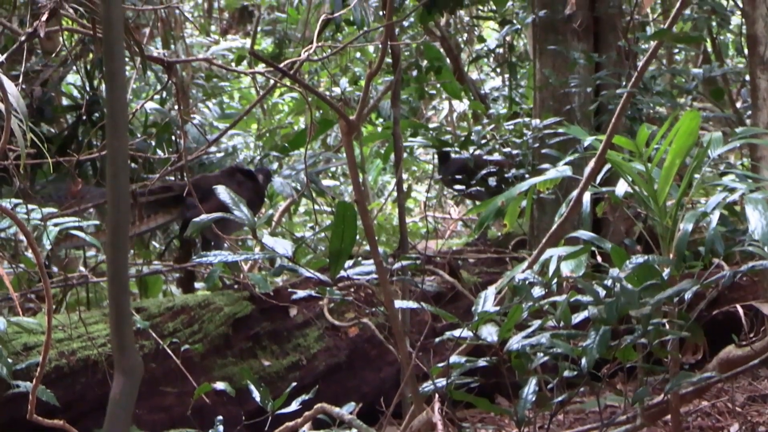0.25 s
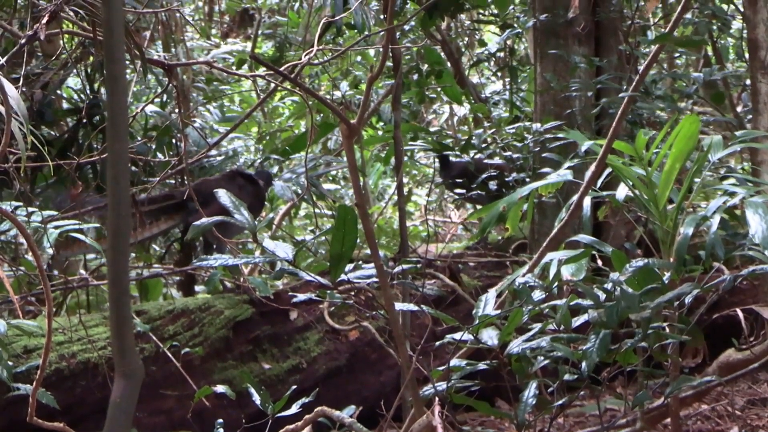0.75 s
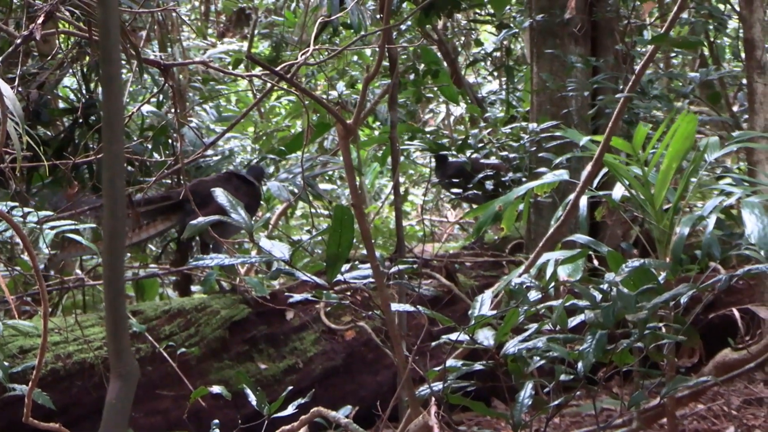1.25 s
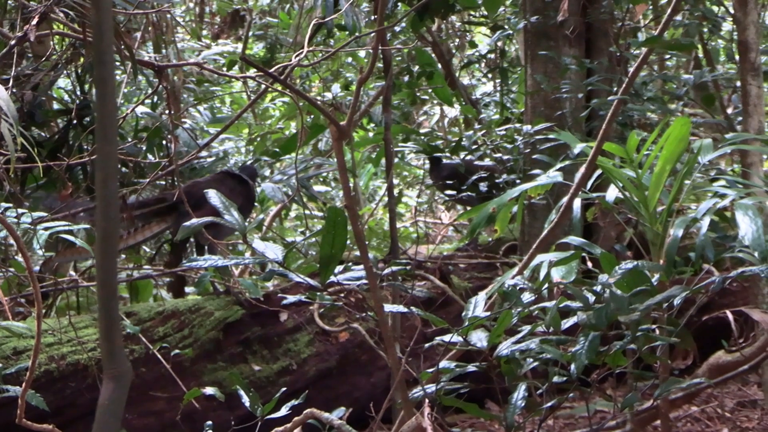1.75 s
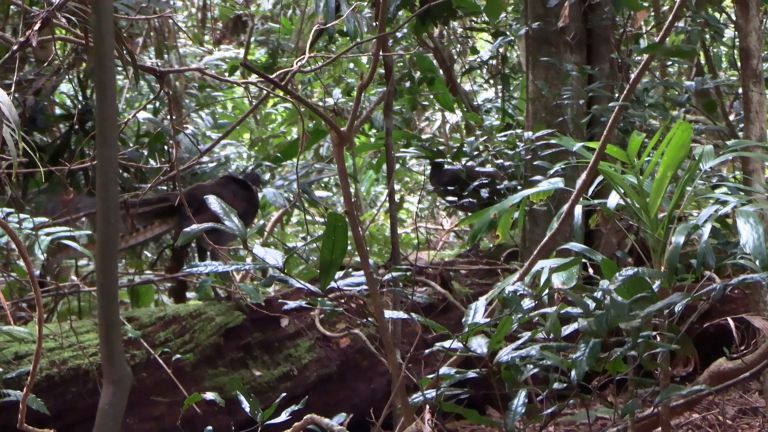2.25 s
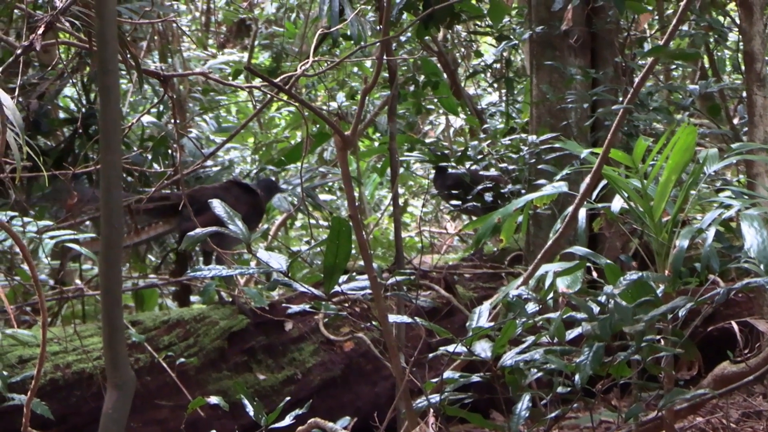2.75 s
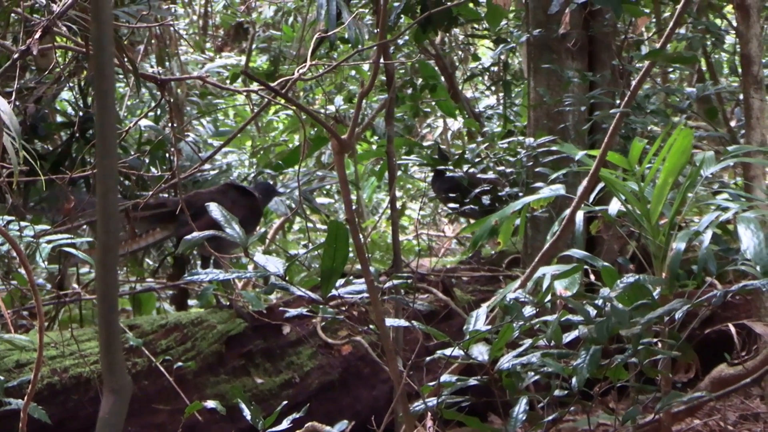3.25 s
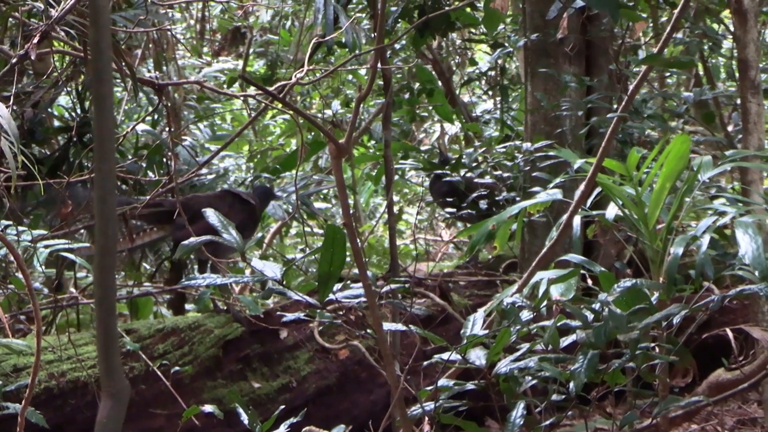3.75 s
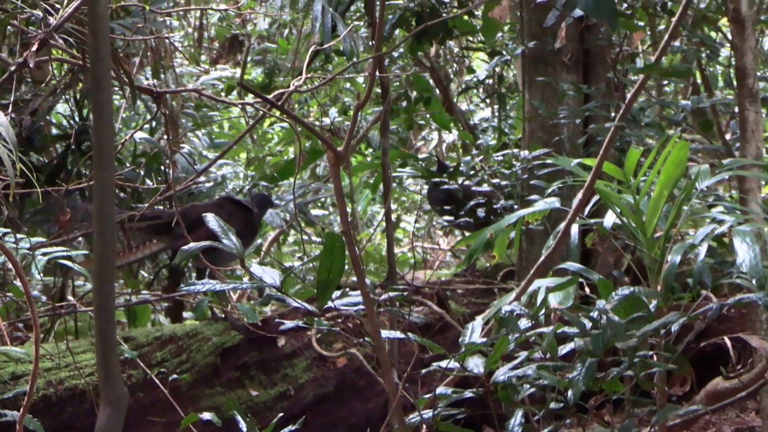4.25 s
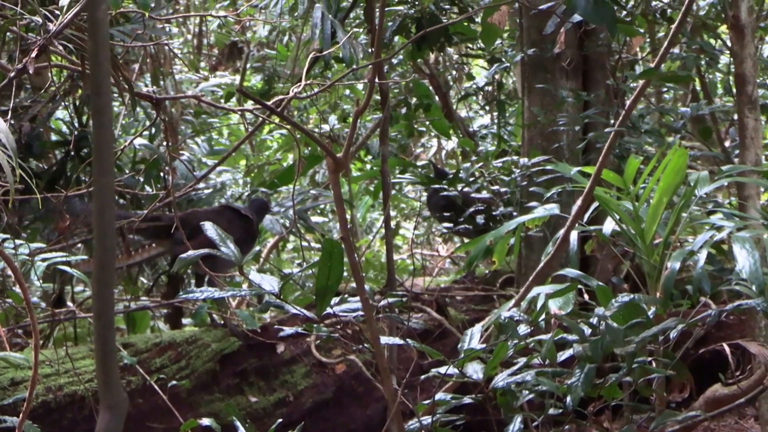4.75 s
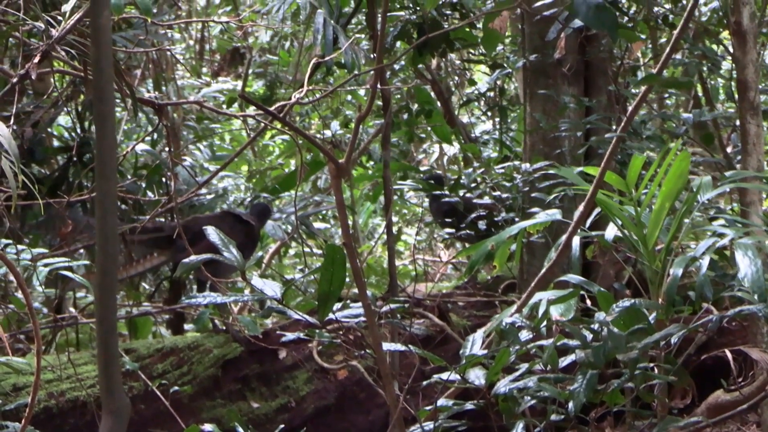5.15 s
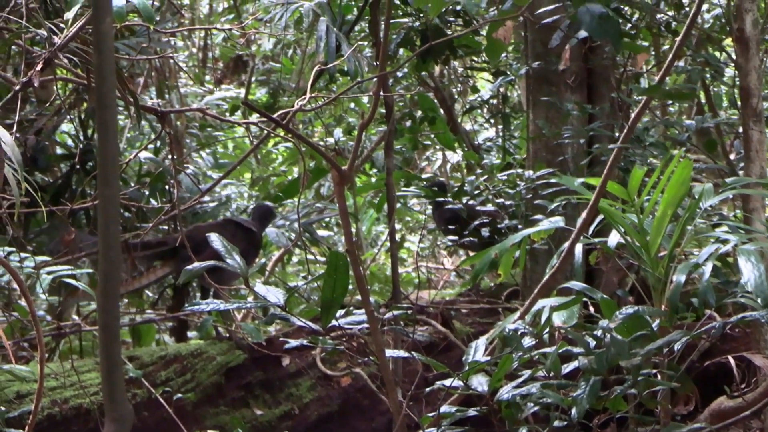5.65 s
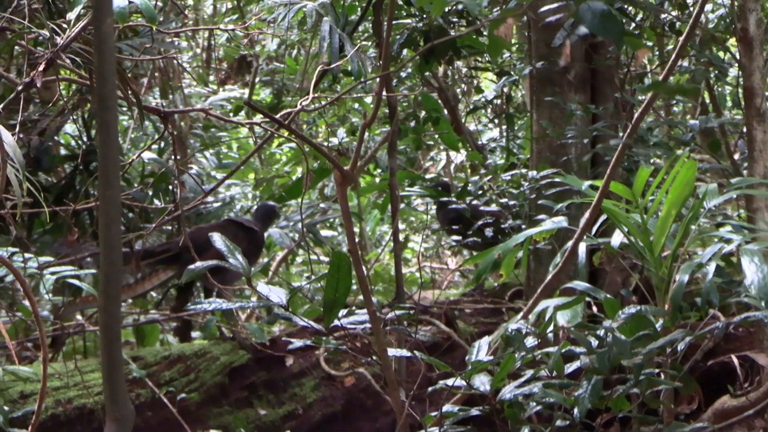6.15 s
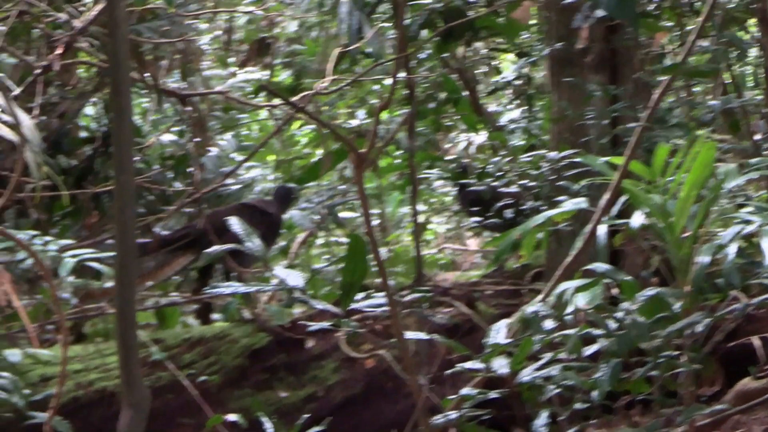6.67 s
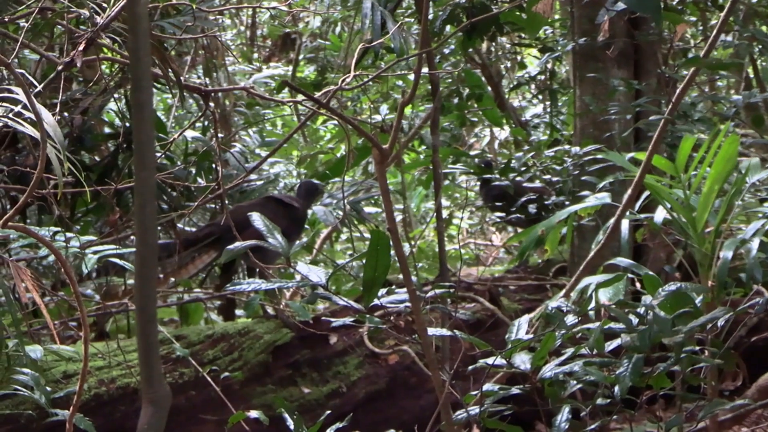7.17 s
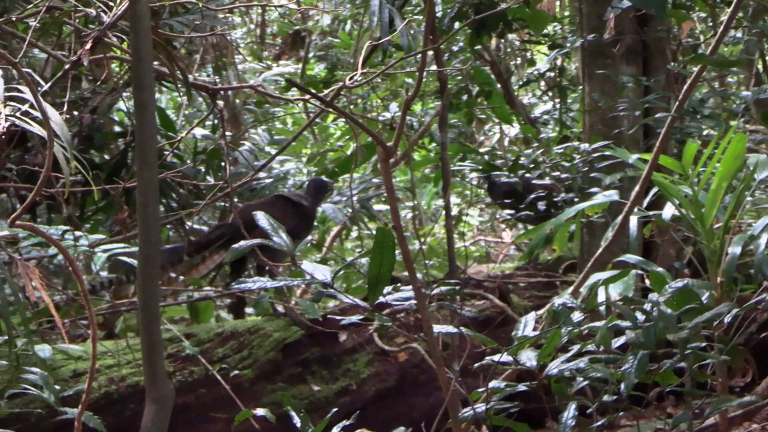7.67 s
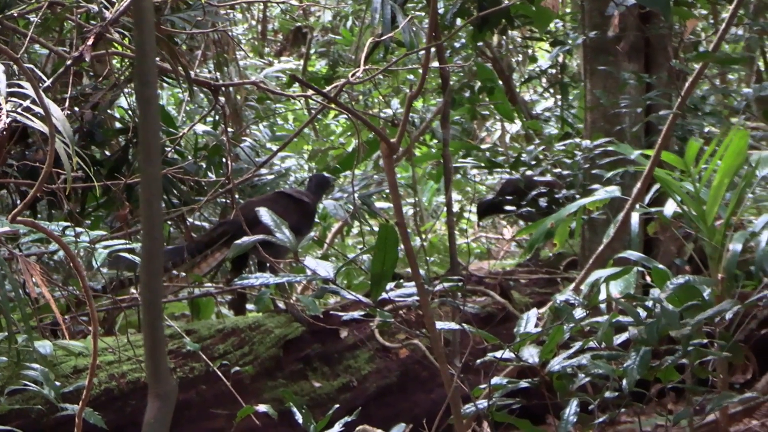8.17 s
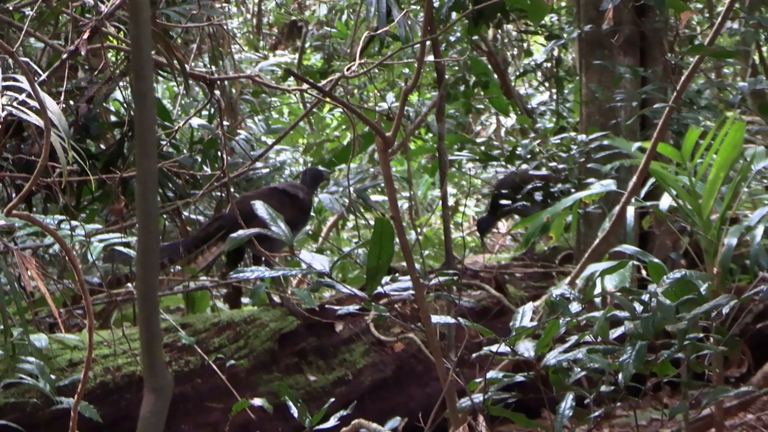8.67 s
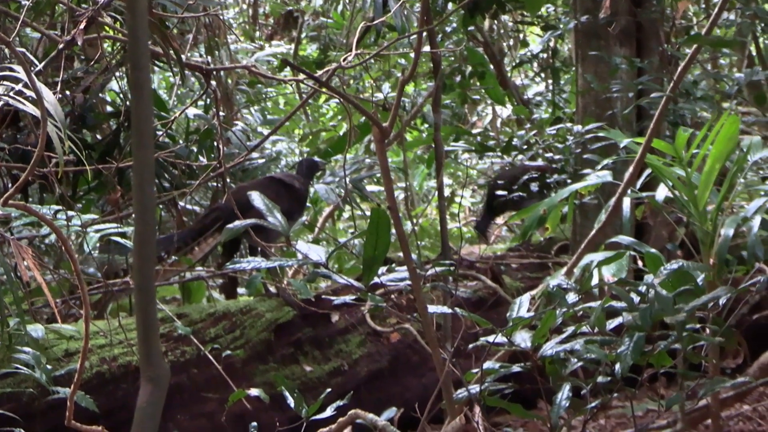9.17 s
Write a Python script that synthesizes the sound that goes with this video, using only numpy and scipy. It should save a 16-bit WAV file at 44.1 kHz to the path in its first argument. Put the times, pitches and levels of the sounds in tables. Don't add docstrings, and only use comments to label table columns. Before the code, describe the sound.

A nearby bird repeats sharp bill clicks, each sweeping up into a whoop and dry rasp, while distant whistles echo through breezy rainforest.

```python
import sys
import numpy as np
from scipy import signal
from scipy.fft import rfft, irfft
from scipy.io import wavfile
from scipy.ndimage import uniform_filter1d

SR = 44100
rng = np.random.default_rng(int(sys.argv[2]) if len(sys.argv) > 2 else 0)


def transcribe(signal):
    frames = np.atleast_2d(signal).T
    limited = np.clip(frames, -1, 1)
    pcm = np.round(limited * 32767).astype(np.int16)
    wavfile.write(sys.argv[1], SR, pcm)


def volts_from_decibels(level):
    exponent = np.asarray(level, float) / 20
    return 10 ** exponent


N = 415422
LEAD = SR // 5

# (frequency [Hz], level [dB per Hz])
FOREST_SPECTRUM = [(350, -15), (600, -7), (688, -6), (916, -5.5), (1310, -8), (1500, -14), (3180, -19.5),
                   (3400, -20), (15700, -30.5)]
FOREST_DB = -52.5
# (frequency [Hz], level [dB per Hz])
WIND_SPECTRUM = [(7.1, -13.5), (12, 11), (29, 8.5), (40, -1.5), (60, -13.5), (117, -10), (204, -30.5),
                 (252, -28.5), (333, -34.5), (600, -39), (780, -60), (1320, -120)]
# (time [s], level [dB])
GUST = [(0, -28), (.7, -35.5), (1.301, -32), (1.8, -37.5), (2.2, -34.5), (3, -32.5), (4.698, -33),
        (5.2, -37), (5.802, -32.5), (6.301, -34.5), (7.0, -34.5), (7.4, -32), (7.7, -35), (8.1, -32.5),
        (9.1, -34.5), (9.42, -29.5)]
# (low edge [Hz], high edge [Hz], steady level [dB], share of gust followed [1], own wander [dB])
WIND_BANDS = [
    (7.95, 49.5, -28.5, 1, 0.33),
    (48.5, 193, -36., 0.055, .5),
    (189.8, 563, -48, 0.53, .5),
]
# (time [s], pitch [Hz], length [s], level [dB])
KNOCKS = [
    (5.5, 171.3, 0.02, -34),
    (7.72, 65.9, 0.042, -24.5),
    (9.03, 166, 0.03, -37.5),
]
# (time [s], length [s], first pitch [Hz], last pitch [Hz], level [dB])
FAR_WHISTLES = [(1.14, 0.034, 3630, 3970, -29), (1.481, .05, 3510, 3850, -32.5),
                (1.798, 0.038, 3380, 3795, -31), (2.138, 0.031, 3364, 3700, -29),
                (2.835, 0.062, 3430, 3870, -35.5), (4.538, 0.038, 3370, 3890, -33),
                (5.266, 0.053, 3370, 4014, -33.5), (5.966, 0.053, 3276, 3836, -34),
                (6.685, 0.043, 3320, 3800, -34), (7.46, 0.041, 3395, 3840, -34),
                (8.853, 0.037, 3326, 3714, -32.5)]
# (time [s], length [s], first pitch [Hz], last pitch [Hz], level [dB])
CHIRPS = [
    (3.032, .015, 5150, 6000, -48),
    (3.277, .026, 6050, 6800, -57),
    (4.112, .011, 6240, 7600, -58),
    (4.513, 0.015, 7320, 7350, -48),
]

# (click time [s], click peak [dB], click to top of whoop [ms], whoop level [dB])
FIGURES = [(-0.036, -15, 138.4, -30), (0.19, -13.5, 136.4, -30), (0.418, -11.5, 132.4, -28.5),
           (0.6424, -12, 127, -28.5), (0.8633, -11.5, 126, -28), (1.0822, -14, 113, -29),
           (4.697, -30, 142, -28), (4.935, -17.5, 132.5, -29.5), (5.159, -11.5, 134, -26),
           (5.3901, -12.5, 129, -27.5), (5.613, -11, 131, -26.5), (5.8348, -11.5, 125, -30.5),
           (6.0518, -14.5, 125, -26.5), (6.2733, -12.5, 124, -28), (6.792, -34, 140.4, -26.5),
           (7.0268, -14.5, 129.4, -27.5), (7.251, -13.5, 133.4, -26.5), (7.4724, -13.5, 134, -29.5),
           (7.6982, -13, 133, -26.5), (7.928, -13, 130, -27), (8.1528, -12, 127, -27.5),
           (8.3811, -15, 116.5, -29)]
# (share of the way to the top [1], pitch [Hz], level [dB])
LOW_VOICE = [(.2, 650, -32), (.27, 680, -14), (.45, 720, -13.5), (.63, 800, -3.5), (.74, 980, -1.5),
             (.85, 1270, 1), (.94, 1700, 2.5), (.995, 2250, -8), (1.03, 3200, -22)]
# (share of the way to the top [1], pitch [Hz], level [dB])
UPPER_VOICE = [(.04, 1230, -14), (.16, 1285, 0), (.39, 1340, 1), (.75, 1400, -1), (.82, 1680, -2),
               (.9, 2200, -4), (.95, 2400, -26)]
# (partial number [1], level [dB])
OVERTONES = [(3, -39), (4, -0.5), (5, -19), (6, -10), (7, -20.5), (8, -21), (9, -21), (10, -22)]
OVERTONE_DB, BEND_FROM_HZ, BEND_DB_PER_OCTAVE = -4.5, 1320, -45
# (peak, rise, fall [shares of the way], peak level [dB], later level [dB])
BLOOM = (.25, .13, .11, 5.5, -12.)
USUAL_MS, UPPER_DB, RASP_DB = 117.7, -42.5, -24.5
UPPER_DB_PER_MS, RASP_DB_PER_MS = -0.27, -0.0235
# (delay [s], rise [s], fall [s], level [dB], pulse rate [Hz], mouth resonance [Hz])
OPENING_AIR = [
    (.006, 0.0038, 0.023, -1, 1500, 4510),
    (.035, 0.045, 0.05, -7, 1500, 6260),
    (.03, 0.015, 0.027, -14.5, 1500, 8600),
]
OPEN_SPREAD_DB, OPEN_SPREAD_SHARE = 2, 0.043
# (delay after top [s], rise [s], fall [s], level [dB], slide per cycle [1], mouth resonance [Hz])
CLOSING_RASPS = [
    (.012, 0.018, 0.012, 0.5, -.03, 2470),
    (.034, 0.0083, 0.0069, 0.5, 0.06, 2560),
    (0.061, 0.013, 0.013, -1.5, 0.064, 2570),
]
# (time [s], pitch [Hz], level [dB])
FALLING_NOTE = [
    (1.19, 1450, -37),
    (1.192, 1288, -39),
    (1.201, 950, -36),
    (1.209, 848, -25),
    (1.221, 680, -34.5),
    (1.225, 640, -55),
]
# (loudest time [s], rise [s], level [dB], mouth resonance [Hz])
SWELLING_RASPS = [(1.25, 0.011, -29.5, 4370), (1.348, 0.019, -33, 4900), (1.478, .022, -31, 4050),
                  (1.655, .025, -36, 3970), (1.935, 0.022, -34.5, 4900), (2.123, 0.023, -39, 4760),
                  (2.534, 0.017, -41, 1000), (2.665, .018, -43.5, 3800), (3.428, .014, -36, 2980),
                  (3.475, 0.016, -38.5, 2440), (3.504, 0.0076, -48, 3000), (8.708, 0.0085, -33.5, 1830),
                  (8.832, 0.0097, -35, 2740)]
RASP_FALL_SHARE, RASP_HZ = 0.69, 821
# (loudest time [s], fall [s], level [dB], mouth resonance [Hz])
ABRUPT_RASPS = [(1.193, 0.0045, -27, 4200), (1.447, .0092, -39, 1320), (2.583, 0.02, -31.5, 2550),
                (2.63, .0053, -38.5, 2600), (2.691, 0.011, -33.5, 1880), (2.715, 0.12, -47.5, 2630),
                (2.852, 0.0093, -49, 4460), (3.4, 0.011, -41.5, 2600), (3.536, 0.013, -45, 4020),
                (3.563, .0035, -41, 1670), (3.57, 0.019, -45.5, 4630), (3.653, 0.013, -45.5, 2820),
                (3.798, 0.0089, -46, 4400), (3.893, 0.015, -51, 5900), (4.228, .038, -50, 5200),
                (8.557, 0.012, -33, 5130), (8.723, 0.013, -44.5, 4700)]
ABRUPT_RISE_S, ABRUPT_HZ = 0.0036, 860
# (loudest time [s], rise [s], level [dB])
PUFFS = [(3.621, 0.018, -52), (3.72, 0.032, -56.5), (4.2, 0.014, -51), (6.613, .03, -40),
         (8.769, 0.0099, -44.5), (8.893, 0.016, -47), (8.971, 0.026, -45), (9.045, 0.046, -48),
         (9.125, .038, -43.5), (9.21, .038, -43), (9.29, 0.032, -43), (9.381, 0.044, -42.5)]
PUFF_FALL_S, PUFF_HZ, PUFF_MOUTH_HZ = 0.0072, 1497, 4480
# (time [s], length [s], first pitch [Hz], last pitch [Hz], level [dB])
PIPS = [
    (4.696, 0.0031, 2680, 1970, -20),
    (6.7908, 0.0043, 2460, 1640, -20.5),
]
# (frequency [Hz], level [dB])
THROAT = [(500, -12), (750, 1.5), (1500, 6.5), (2600, 3.5), (3600, 4), (4500, 1.5), (5900, -3.5),
          (6400, -13.5), (7000, -10), (7600, -17.5), (8400, -15), (9100, -20), (12500, -25), (16000, -68)]


def add(track, s, sound):
    i = int(round(s * SR)) + LEAD
    track[i:i + len(sound)] += sound[:len(track) - i]


def colour(x, shape, mouth_hz=1., mouth_db=0.):
    hz = np.fft.rfftfreq(len(x), 1 / SR) + 1
    at, db = np.transpose(shape)
    db = np.interp(np.log(hz), np.log(at), db, left=-70, right=-70)
    gain = volts_from_decibels(db + mouth_db * np.exp(-(np.log2(hz / mouth_hz) / 0.26) ** 2))
    cepstrum = irfft(np.log(gain), len(x))
    cepstrum[1:len(x) // 2] *= 2
    cepstrum[len(x) // 2 + 1:] = 0
    coloured = irfft(rfft(x) * np.exp(rfft(cepstrum)), len(x))
    return coloured / np.sqrt(np.mean(gain ** 2))


def walk(size, rate):
    k = max(int(SR / rate), 1)
    held = rng.standard_normal(size + SR)[np.arange(size) // k]
    return 1.52 * uniform_filter1d(uniform_filter1d(held, k), k)


def scatter(x, t60, build, wet_db, shape):
    t = np.arange(2 * SR) / SR
    tail = colour(rng.standard_normal(len(t)), shape)
    tail = tail * (1 - np.exp(-t / build)) * 1000. ** (-t / t60)
    return signal.fftconvolve(x, volts_from_decibels(wet_db) * tail / np.sqrt(np.sum(tail ** 2)))[:len(x)]


def forest_hiss():
    level = volts_from_decibels(FOREST_DB + 0.067 * walk(size=N, rate=4.9))
    return level * colour(rng.standard_normal(N), FOREST_SPECTRUM)


def wind():
    s, db = np.transpose(GUST)
    gust_db = np.interp(np.arange(N) / SR, s, db - db.mean())
    rumble = colour(rng.standard_normal(N), WIND_SPECTRUM)
    out = 0
    for low_hz, high_hz, db, share, wander_db in WIND_BANDS:
        band = signal.butter(3, (low_hz, high_hz), "band", fs=SR, output="sos")
        part = signal.sosfilt(band, rumble)
        level_db = db + share * gust_db + wander_db * walk(size=N, rate=2.5)
        out = out + volts_from_decibels(level_db) * part / part.std()
    return out


def knocks():
    t = np.arange(N) / SR
    out = 0
    for s, hz, length, db in KNOCKS:
        out = out + volts_from_decibels(db) * np.exp(-((t - s) / length) ** 2) * np.sin(2 * np.pi * hz * (t - s))
    return out


def whistles(table, bend):
    track = np.zeros(N + LEAD)
    for s, length, from_hz, to_hz, db in table:
        way = np.arange(int(length * SR)) / (length * SR)
        pitch = from_hz + (to_hz - from_hz) * np.sin(np.pi / 2 * way ** bend) ** 2
        swell = np.sqrt(np.sqrt(np.sin(np.pi * way)))
        add(track, s, volts_from_decibels(db) * swell * np.sin(2 * np.pi * np.cumsum(pitch) / SR))
    return track


def click(db):
    t = np.arange(-60, 60) / SR * volts_from_decibels(0.19 * (db + 5))
    snap = np.exp(-(t / .00056) ** 2) * np.cos(2 * np.pi * (2450 * t + 1.25e6 * t ** 2) - .45)
    snap = snap + volts_from_decibels(-8.5) * np.exp(-((t - .0003) / 0.0006) ** 2) * np.sin(2 * np.pi * 4700 * t)
    out = np.zeros(1024)
    for lag_s, echo_db in ((0, 0), (.00105, -8), (.0077, -13), (.009, -9), (.0175, -13)):
        i = int(lag_s * SR)
        out[i:i + len(t)] += volts_from_decibels(db + echo_db) * snap
    return signal.sosfiltfilt(signal.butter(2, 1120, "high", fs=SR, output="sos"), out)


def low_voice(way, whoop_db):
    at, hz, db = np.transpose(LOW_VOICE)
    pitch = np.exp(np.interp(way, at, np.log(hz)))
    level_db = np.interp(way, at, db, left=-90, right=-90) + whoop_db + 3.0
    level_db = level_db + 2.0 * walk(size=8192, rate=90)
    return volts_from_decibels(level_db) * np.sin(2 * np.pi * np.cumsum(pitch) / SR)


def upper_voice(way, upper_db):
    at, hz, db = np.transpose(UPPER_VOICE)
    pitch = np.interp(way, at, hz)
    second = volts_from_decibels(np.interp(way, at, db, left=-90, right=-90))
    thin = volts_from_decibels(BEND_DB_PER_OCTAVE * np.maximum(np.log2(pitch / BEND_FROM_HZ), 0))
    peak, rise, fall, peak_db, after_db = BLOOM
    bloom = volts_from_decibels(peak_db) * np.exp(-((way - peak) / np.where(way < peak, rise, fall)) ** 2)
    first = second * (bloom + (way > peak) * volts_from_decibels(after_db) * thin)
    higher = second * thin * volts_from_decibels(OVERTONE_DB)
    pitch = pitch * (1 + .015 * rng.standard_normal() + .011 * walk(size=8192, rate=300))
    phase = 2 * np.pi * np.cumsum(pitch) / SR
    flutter = 1 + .35 * walk(size=8192, rate=300)
    partials = sum(volts_from_decibels(db) * np.sin(int(k) * phase) for k, db in OVERTONES)
    overtones = higher * (0.11 + walk(size=8192, rate=800)) * partials
    tone = first * np.sin(phase) + second * flutter * np.sin(2 * phase) + overtones
    return volts_from_decibels(upper_db + 7.0) * tone


def rasp(track, s, rise, fall, db, hz, mouth_hz, jitter, breath, glide=0., mouth_db=7.0):
    chance = rng.standard_normal((3, 4096))
    slide = np.clip(glide * (np.arange(4096) - 2048 * hz / SR), -.45, .45)
    periods = SR / hz * np.exp(jitter * chance[0] - slide + min(glide, 0) * 8)
    at = np.cumsum(periods).astype(int)
    at = at[at < 4096]
    pulses = np.zeros(4096)
    pulses[at] = -np.sqrt(SR / hz) * volts_from_decibels(2.8 * chance[1, :len(at)])
    clumps = volts_from_decibels(2.5 * walk(size=4096, rate=450))
    t = (np.arange(4096) - 2048) / SR
    swell = np.exp(-1.6 * np.where(t < 0, t / rise, t / fall) ** 2)
    source = swell * (pulses + breath * clumps * chance[2])
    add(track, s - 2048 / SR, volts_from_decibels(db) * colour(source, THROAT, mouth_hz, mouth_db))


def falling_note():
    s, hz, db = np.transpose(FALLING_NOTE)
    t = np.arange(s[0], s[-1], 1 / SR)
    phase = 2 * np.pi * np.cumsum(np.interp(t, s, hz)) / SR
    partials = sum(volts_from_decibels(-2.5 * abs(k - 2)) * np.cos(k * phase) for k in range(1, 8))
    return volts_from_decibels(np.interp(t, s, db)) * partials


def figure(track, s, click_db, top_ms, whoop_db):
    delay_ms, top_s = top_ms - USUAL_MS, top_ms / 1000
    upper_db = UPPER_DB + UPPER_DB_PER_MS * delay_ms
    rasp_db = RASP_DB + RASP_DB_PER_MS * delay_ms
    add(track, s - 60 / SR, click(click_db + 3))
    way = np.arange(8192) / SR / top_s
    add(track, s, low_voice(way, whoop_db) + upper_voice(way, upper_db))
    air_db = (upper_db + max(click_db, -15) - 17) / 2
    for after, rise, fall, db, hz, mouth_hz in OPENING_AIR:
        db = db + OPEN_SPREAD_DB * rng.standard_normal()
        mouth_hz = mouth_hz * (1 + OPEN_SPREAD_SHARE * rng.standard_normal())
        rasp(track, s + after, min(rise, after / 2), fall, air_db + db, hz, mouth_hz,
             jitter=0.52, breath=2.12, mouth_db=11.0)
    if abs(s + top_s - FALLING_NOTE[0][0]) < .05:
        return
    for after, rise, fall, db, glide, mouth_hz in CLOSING_RASPS:
        rasp(track, s + top_s + after, rise, fall, rasp_db + db - 4, 900, mouth_hz,
             jitter=.1, breath=.45, glide=glide)


def lyrebird():
    track = np.zeros(N + LEAD)
    for s, click_db, top_ms, whoop_db in FIGURES:
        figure(track, s, click_db, top_ms, whoop_db)
    add(track, FALLING_NOTE[0][0], falling_note())
    for s, rise, db, mouth_hz in SWELLING_RASPS:
        rasp(track, s, rise, RASP_FALL_SHARE * rise, db, RASP_HZ, mouth_hz, jitter=.09, breath=.5)
    for s, fall, db, mouth_hz in ABRUPT_RASPS:
        rasp(track, s, ABRUPT_RISE_S, fall, db, ABRUPT_HZ, mouth_hz, jitter=.14, breath=.6)
    for s, rise, db in PUFFS:
        rasp(track, s, rise, PUFF_FALL_S, db, PUFF_HZ, PUFF_MOUTH_HZ, jitter=0.66, breath=1.07, mouth_db=6.5)
    return track + whistles(PIPS, bend=0.54)


def scene():
    background = forest_hiss() + wind() + knocks()
    far, small, bird = whistles(FAR_WHISTLES, bend=1.22), whistles(CHIRPS, bend=0.63), lyrebird()
    birds = 0.89 * far + scatter(far, 0.81, 0.0031, 3.9, [(2000, 0), (6000, 0)])
    birds += small + scatter(small, 0.14, 0.0029, -1, [(3000, -6), (10000, 6)])
    birds += bird + scatter(bird, 0.14, 0.0031, -4, [(400, -3.0), (1200, -4.5), (2600, -1.5), (4500, 1.5),
                                                     (8000, 3.5), (16000, -16)])
    birds += scatter(bird, 0.49, 0.074, -9.0, [(400, -4.0), (1500, -6.0), (4000, -4.5), (8000, 3.0), (16000, -9)])
    return (birds[LEAD:] + background)[None]


def band_limit(x):
    return signal.sosfilt(signal.butter(12, 15960, fs=SR, output="sos"), x)


def record(dry):
    return band_limit(dry)


dry = scene()
out = record(dry)
transcribe(out)
```